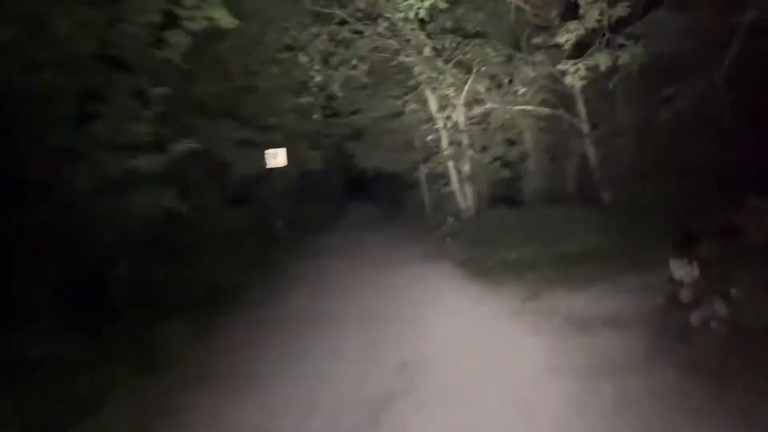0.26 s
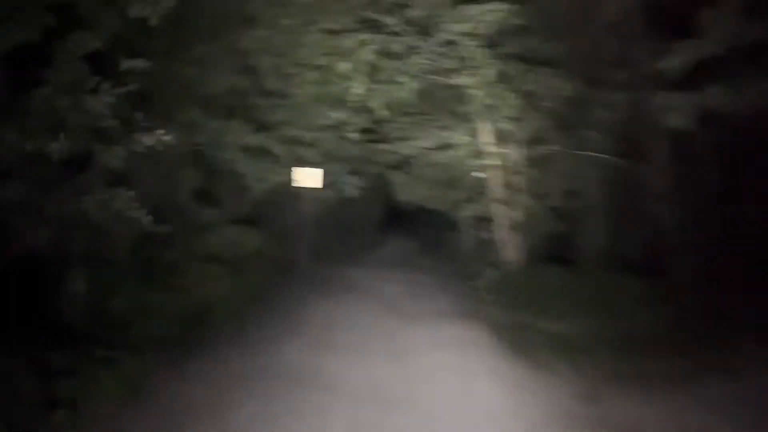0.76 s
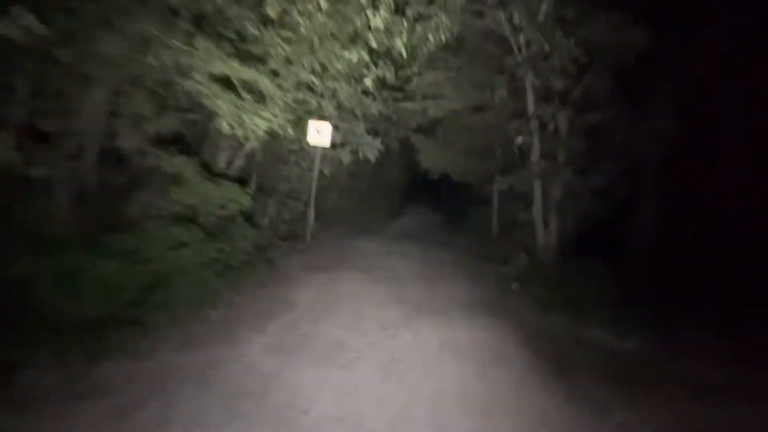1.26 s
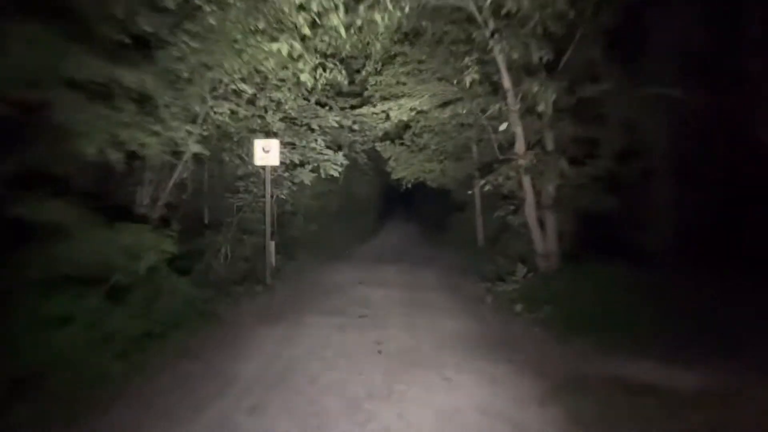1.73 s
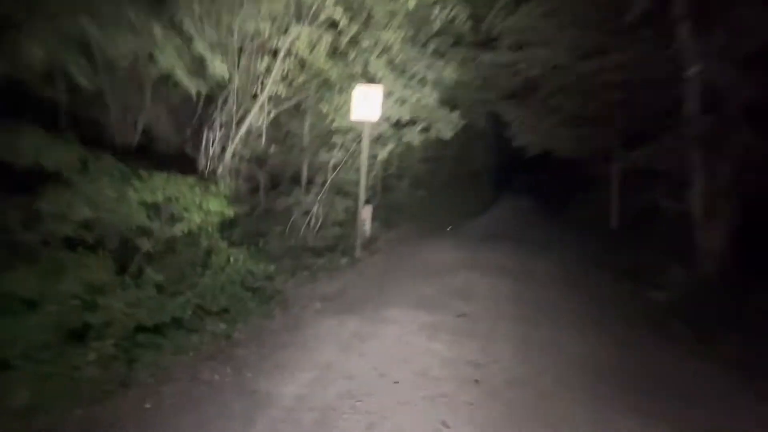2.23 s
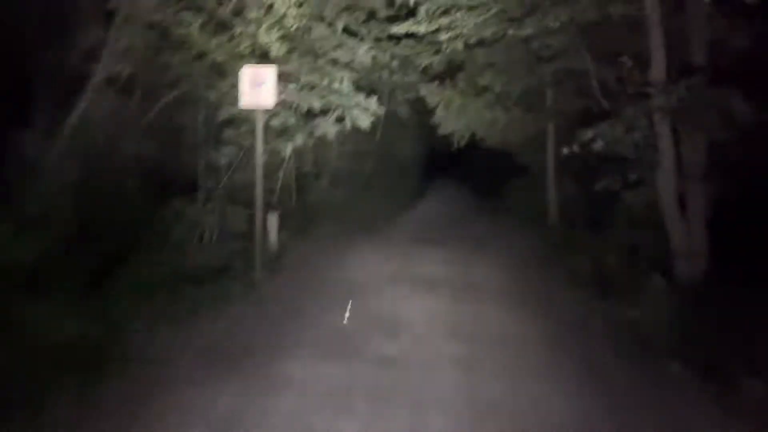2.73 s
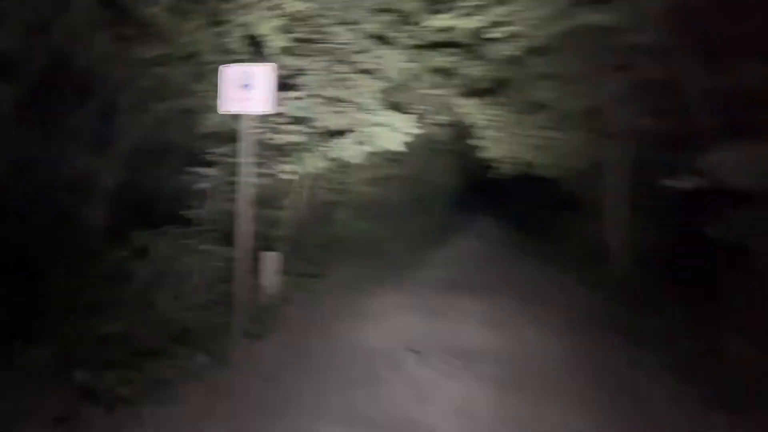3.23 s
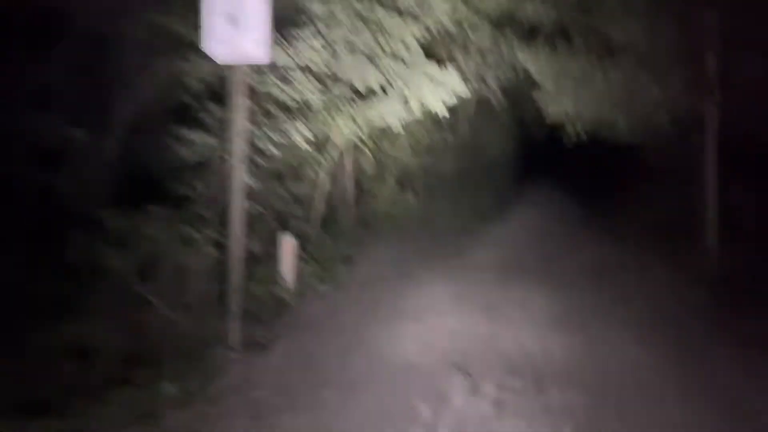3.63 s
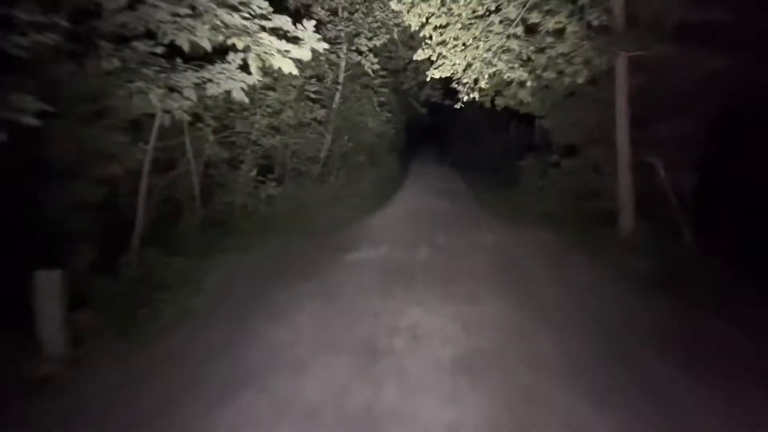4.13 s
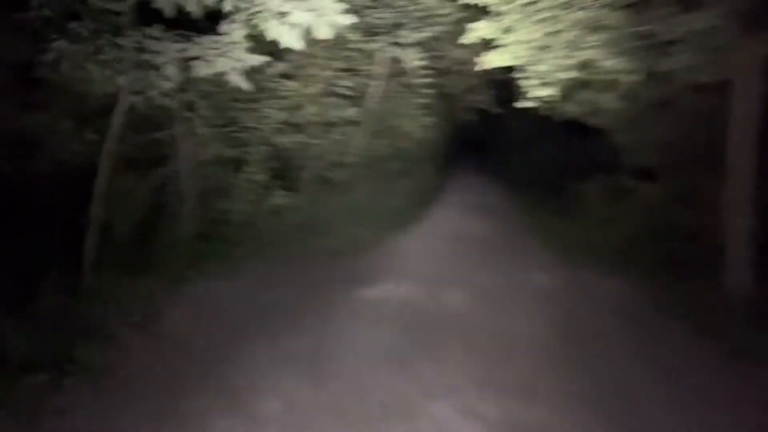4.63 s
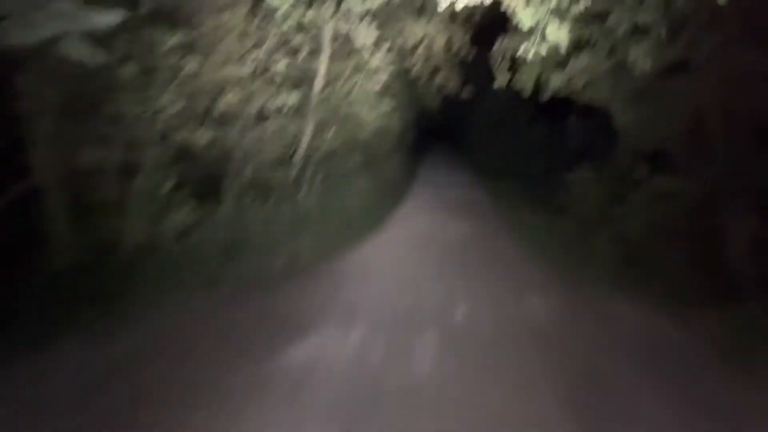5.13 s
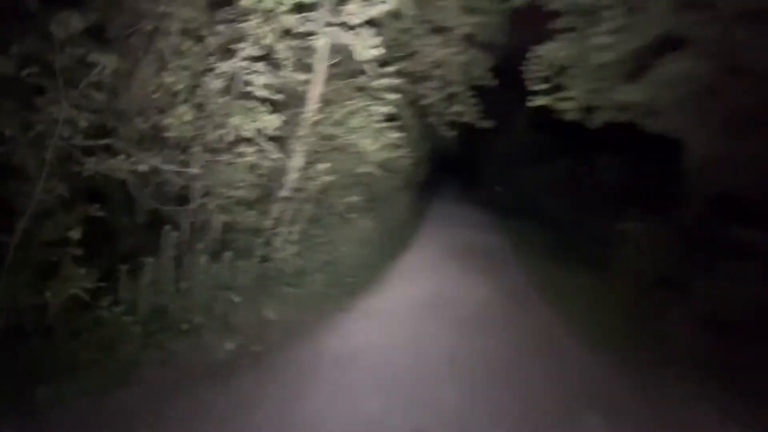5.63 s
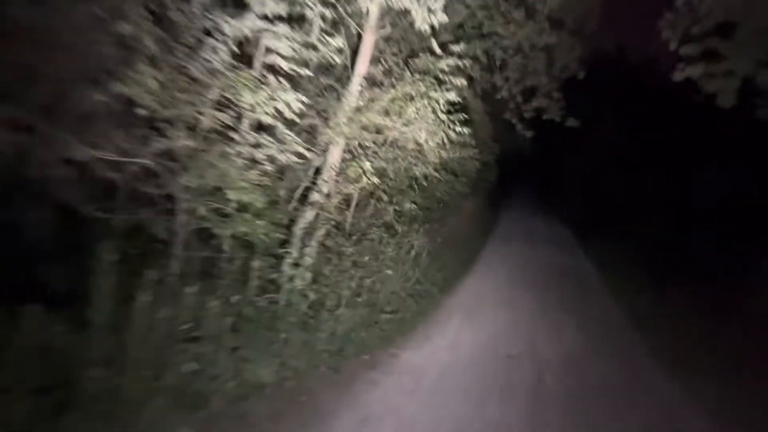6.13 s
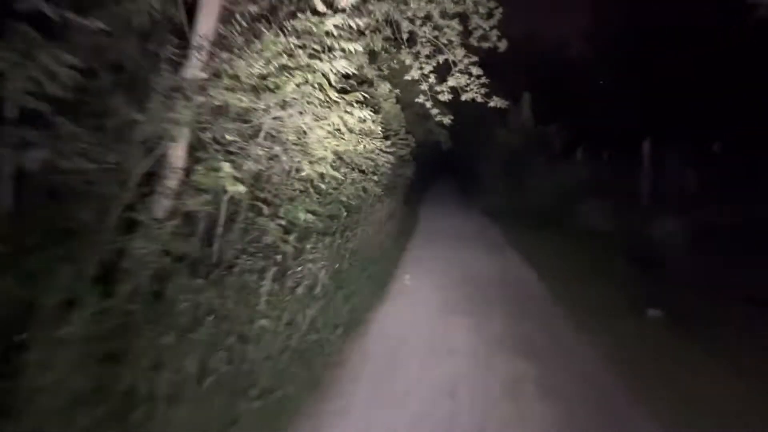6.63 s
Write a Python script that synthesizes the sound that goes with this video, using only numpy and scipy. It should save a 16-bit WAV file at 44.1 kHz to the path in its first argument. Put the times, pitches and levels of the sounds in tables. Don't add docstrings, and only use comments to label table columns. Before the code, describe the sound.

A person hurries along a gravel path outdoors, carrying a small stereo microphone well above the feet. From 0 to 0.7 s, stones grind and tick in a steady gritty crunch, over low rumble and rubbing cloth and soles. From 0.8 to 2.2 s it thins to softer grinding with separate sharp snaps; a low bump comes near 2.26 s. Around 2.5-2.9 s the crunch is densest and brightest, many stones cracking together, followed by a fine gritty scuff near 3.1 s. After a brief dip, another crunch arrives at 3.45 s with a short, hard low thump at 3.49 s and a softer one at 3.6 s, rumble swelling until 3.9 s. It eases from 4 to 5 s, a small bump at 4.5 s, crunches again near 5.4 s, drops around 5.75 s, then gathers light clicks and dull knocks around 6-6.3 s, thinning and fading quickly at 6.8 s.

```python
import sys
import numpy as np
from scipy import signal
from scipy.fft import rfft, irfft, next_fast_len
from scipy.io import wavfile

SR = 44100
rng = np.random.default_rng(int(sys.argv[2]) if len(sys.argv) > 2 else 0)


def digitize_waveform(pressure):
    field = np.atleast_2d(pressure).T
    bounded = np.clip(field, -1, 1)
    quanta = np.round(bounded * 32767).astype(np.int16)
    wavfile.write(sys.argv[1], SR, quanta)


def invert_db(level):
    return 10 ** (np.asarray(level, dtype=float) / 20)


N = 302967
HZ = np.fft.rfftfreq(2 * next_fast_len(N // 2 + 1), 1 / SR)
SIZE = 2 * (len(HZ) - 1)

RANGE_EDGES = [500, 1700, 3000, 4500, 7500, 10800, 17000]


def stones():
    # [f/Hz, level/dB per Hz]
    sum_spectrum = [(290, -20.5), (500, 3.5), (700, 0), (1280, 4.5), (1690, -1.5), (2130, -1.5),
                    (3540, -7.5), (4530, -6.5), (5240, -12), (8210, -20.5), (9630, -17.5), (11600, -20),
                    (14200, -21), (16000, -45)]
    # [f/Hz, level/dB per Hz]
    difference_spectrum = [(290, -13), (500, 6), (708, -1.5), (1530, 3.5), (1790, -10.5), (2650, -10.5),
                           (5160, -15.5), (6510, -16.5), (7100, -15.5), (8580, -11.5), (10100, -17),
                           (12000, -46), (13300, -20), (16000, -22.5)]
    # [f/Hz, width/Hz, level/dB]
    resonances = [(1310, 110, 5.), (2190, 300, 3.), (5230, 260, 5.), (6420, 260, 8.), (9670, 320, 3.),
                  (11300, 260, 4.)]
    # [f/Hz, width/Hz, level/dB]
    notch = (8305, 1120, -8)
    # [f/Hz, angle/rad]
    phase_turn = [(500, 0), (1100, 4), (1460, 4.5), (1810, 4.5), (3300, 1.5), (5000, 1.4), (6800, -2.5),
                  (8100, 1.5), (8500, 1.5), (11500, 1.6), (12200, -1.6)]
    # [f/Hz, share/1]
    common_share = [(500, 0.95), (1200, 1), (2000, 0.18), (5000, 0.18), (9000, 0.12)]

    housing_db = sum(resonance(*row) for row in resonances)
    both = causal(read(sum_spectrum, HZ) + housing_db + resonance(*notch))
    apart = invert_db(read(difference_spectrum, HZ) + 0.5 + 0.067 * housing_db)
    apart = apart * np.exp(1j * (np.angle(both) + read(phase_turn, HZ)))
    ranges = [band(lo, hi) for lo, hi in zip(RANGE_EDGES, RANGE_EDGES[1:])]
    heard = [np.sqrt(np.mean(abs(both * r) ** 2)) for r in ranges]

    def hissed(drive, noise):
        return sum(rfft(d * noise, SIZE) * r / h for d, r, h in zip(drive, ranges, heard))

    cracks, rings = snaps()
    grind = grinding()
    noises = rng.standard_normal((3, N))
    near = hissed(grind, noises[0])
    other = hissed(np.hypot(grind, 0.45 * cracks), noises[1])
    rings = rfft(rings, SIZE) * band(700, 7500) / abs(both).clip(1e-3)
    snap = hissed(cracks, noises[2]) + rings
    same = np.clip(read(common_share, HZ), 0, 1)
    side = same * near + np.sqrt(1 - same ** 2) * other + 0.7 * snap
    return irfft([(near + snap) * both, side * apart], SIZE)[:, :N]


def snaps(t60=0.0056, colour_db=3.5, crumble_db=-17, ring_s=0.016, pop_s=0.00017,
          scatter_s=0.00016, sink_s=0.0003, reach_octaves=0.15):
    # [t/s, level/dB, pitch f/Hz, low part/dB, bright
    # part/dB]
    snapping_stones = [(0.0654, -38, 6700, -22, -14), (0.0941, -42, 6240, -26, -13.5),
                       (0.1247, -40, 6660, -24.0, -10), (0.1347, -49, 6400, -1, -8), (0.161, -37.5, 4200, -15, -3),
                       (0.1759, -45, 4160.0, 3, 2), (0.1823, -36, 2600, 4.5, -11.5), (0.1868, -36.5, 6500, 3, -13.5),
                       (0.1904, -49, 1910, 4, -22), (0.2409, -42.5, 6600, -24.0, -7),
                       (0.2499, -42.5, 1590, -19.5, -5), (0.2839, -41, 3750.0, -22, -29.5),
                       (0.3517, -42, 5000, -24.0, -5), (0.3734, -39, 2280, -3, -8), (0.4332, -38, 2110.0, -24.0, -7),
                       (0.4909, -34, 5100, -23.5, -6), (0.5404, -38, 3710, -25.5, -32.0),
                       (0.5473, -33.5, 2400, -19.5, -10), (0.5558, -28, 5150, -13, -8.5),
                       (0.5626, -34, 1590, -1, -14.5), (0.6067, -35, 5100, -24.0, -14.5),
                       (0.6166, -42, 2280, 1, -12), (0.6308, -41.5, 2310, -24.0, -6),
                       (0.7372, -41, 2350.0, -22, -19), (0.7469, -37.5, 4880, -17.0, -25.5),
                       (0.8277, -35.5, 1870, -23, -34), (1.038, -41, 3710, -20, -21), (1.134, -39, 1500, 0, -27),
                       (1.1826, -43, 5140, -19, -8.5), (1.2078, -38, 3740, -5, -23.5),
                       (1.2494, -45, 4110.0, -22, -15.5), (1.3152, -36.5, 5100, -22, -2.5),
                       (1.4393, -28.5, 2290, -17, -46), (1.4646, -31, 3830, -10, -33.5),
                       (1.474, -41, 3500, -15, -30), (1.4857, -35, 2920, -15.5, -24), (1.6821, -29, 3080, -26, -43),
                       (1.9049, -36, 3790, -22, -40),
                       (1.9093, -39.5, 3700, -24.5, -35), (1.963, -39, 3800, -24.0, -17.5),
             (1.9923, -41.5, 3970, -3, -15.5), (2.034, -34, 2230, -11, -35),
             (2.0398, -30.5, 3000, -13.5, -25), (2.179, -42.5, 4410.0, -31, -21),
             (2.2508, -34, 4900, -6.5, -9), (2.343, -36, 2000.0, -24, -23.5),
             (2.41, -30, 1590, -20.5, -31.5), (2.4896, -38.5, 5170, -8.5, -8),
             (2.5089, -31.5, 3580, 3, -23), (2.5244, -34, 5320.0, 1, -11), (2.5316, -44, 2800, -10.0, 4),
             (2.564, -32, 5190.0, -14, -8.5), (2.569, -39.5, 1956, 1, -10), (2.596, -32.5, 5370, 0, -13),
             (2.6108, -47.5, 4650.0, -24.0, 9), (2.6323, -24.5, 5210, -1, -7), (2.6522, -39, 3670, 13, -9),
             (2.6706, -32, 2240, 3, -18), (2.6767, -25, 5200, -14, -3.5), (2.704, -35.5, 2350.0, 0, -12.0),
             (2.724, -29.5, 2070.0, -4, -5), (2.73, -49, 1610.0, 3.0, -7), (2.7606, -37, 2260.0, -0.5, -21),
             (2.7696, -40, 2020.0, -4, -7), (2.778, -30, 1940, 3, -8), (2.8105, -28.5, 5230, -16.5, -20),
             (2.8235, -30, 2140, -19.5, -34), (2.8348, -23.5, 5210, -4, -8), (2.8409, -21.5, 5140, -14, -6),
             (2.854, -32.5, 5050, -6, -18), (2.859, -32, 1980.0, -1.0, -32.0), (2.888, -40, 6600, -8.5, -3),
             (2.8916, -38.5, 4640, 4, -2), (2.93, -53, 2780.0, -12, 12), (2.954, -37.5, 2450.0, 1, -22),
                       (2.966, -43, 2730.0, -5.0, -11.5), (3.001, -39.5, 5050, -24.0, -15.5),
                 (3.0651, -31.5, 2060, 3.5, -15), (3.1027, -36.5, 2260, 1, -6),
                 (3.117, -34, 2430, 4, -10.5), (3.1572, -39, 4960, 6, -10), (3.1787, -27, 2040, 1, -3),
                 (3.1849, -27, 5200, -1, -8), (3.19, -32, 2520, 8, -18), (3.197, -39, 4770, -7, -6),
                 (3.212, -34, 4720, 4, -11), (3.2381, -36, 6660, 2, -5), (3.3667, -34.5, 2530, -3, -6.5),
                 (3.3893, -46, 5240, -22, -3), (3.4049, -40.5, 4850, -24.0, -4.5),
                 (3.4283, -34, 2380, 1, -7), (3.434, -40, 2130.0, 1, -9), (3.451, -33.5, 5150, 9, -15),
                 (3.4559, -31, 2320, 2, -6), (3.463, -43.5, 3980, 1, 2.0), (3.484, -31.5, 5200, 4, -7),
                 (3.518, -39, 5350, -24.0, -3), (3.641, -38.5, 1610.0, 16, -14),
                 (3.669, -30.5, 3970, 7, -16), (3.6776, -47.5, 1740.0, -12.0, -2),
                 (3.686, -49, 4160.0, -17.0, 3), (3.6979, -40.5, 4940, -0.5, -2),
                 (3.777, -43, 2650.0, -15.0, 0.5), (3.7965, -45.5, 6500, 1.5, 0),
                 (3.805, -41, 1870.0, 4, -9), (3.842, -48, 4460.0, -9.0, 1), (3.868, -44, 6400, -11.5, 4),
                 (3.8888, -37.5, 4480.0, -1, -10),
                       (3.907, -43, 2860, 2.5, -10), (3.925, -44, 4050.0, -24.0, -6), (4.056, -40, 4270, -5, -19),
             (4.099, -44.5, 2390.0, 2, -6.5), (4.1213, -30, 3040, 1, -24.5), (4.2308, -32, 2020, -7, -32.0),
             (4.244, -34, 5110, -20, -8), (4.2647, -39.5, 5000, -11, -6.5), (4.2714, -40.5, 2370.0, 7, -9),
             (4.2934, -41, 5060, -8, -6), (4.3199, -31.5, 2170, -11, -35),
             (4.3874, -31.5, 3920.0, -17, -38), (4.408, -37, 3980.0, -9, -25),
             (4.4673, -39.5, 4360, -14, -12.5), (4.4993, -45, 3980.0, -34, -9.5),
             (4.5792, -39.5, 3200, -22, -23), (4.5877, -41.5, 5000, -30, -16), (4.8153, -44, 2350, 3, -4),
             (4.825, -45, 6500, 5, -2.5), (4.85, -52, 5080.0, -7.5, 10), (4.8654, -56, 1620, 10, 8.0),
             (4.888, -43.5, 6480, -24.0, -2), (4.9106, -37.5, 5100, 0, -5.5),
             (4.9761, -40.5, 4650, -24, -16), (4.982, -47, 2350.0, -24.0, -25.0),
             (5.0351, -40, 4400, -5, -17), (5.0491, -34.5, 2240, 1, -11.5), (5.2954, -51, 5120, 1, 4),
             (5.3475, -40, 3750.0, -18, -30.0), (5.3623, -34.5, 2620, -10, -20),
             (5.4, -41, 2390.0, -10.0, -4), (5.4153, -40, 2970, -13.0, -22), (5.453, -39, 4780.0, -1, -34),
             (5.4918, -38.5, 5130, 7, -26), (5.5483, -40.5, 1590, -4, -21), (5.6489, -45.5, 3990, -13, -14),
                       (5.6983, -44, 6600, -6, -21), (5.7714, -49, 2370.0, -28.5, -13),
            (5.7985, -43.5, 2340, -25, -18), (5.879, -42, 2230, -6, -6), (5.8906, -44.5, 6540, -19.5, -9),
            (5.9047, -55, 2020.0, -24.0, 11.5), (6.007, -41, 1980.0, 3, -16), (6.0199, -39, 1700, -11, -14),
            (6.029, -38, 1960.0, -6.5, -18), (6.0423, -39.5, 2770, 6, -18), (6.0858, -43, 4570.0, -28, -15),
            (6.115, -45.5, 6540, -24.0, 1), (6.141, -40, 2150, -24, 0), (6.16, -38.5, 2040, -24.0, -3),
            (6.1944, -43, 5000, -6, -3), (6.2152, -27.5, 5220, 1, -7.5), (6.2215, -41, 2000, -7, -10),
            (6.2364, -41.5, 2080, -10, -6.5), (6.2488, -35, 2150.0, -18, -23), (6.2516, -45, 5000, -15, -1),
            (6.274, -32, 2310, -10, -7), (6.2806, -37, 1710, 1, -10.0), (6.2859, -41, 2120, -22, -18),
            (6.295, -41.0, 1790.0, -8, -10), (6.336, -40, 2353, 5.5, 3), (6.3138, -39.5, 2090, -15, -14),
            (6.397, -36.5, 3060.0, -1, -32.0), (6.404, -41.5, 4930, 2, -2.5), (6.413, -38, 4600, -28, -19),
            (6.523, -50.5, 5000, -8, 3.5), (6.5415, -36, 2330, 1, -10), (6.55, -44.5, 1970, 0, -2),
            (6.6083, -40, 2130.0, 3, -7), (6.616, -42.5, 6300, 3, -6), (6.6902, -49, 6540, -30, 1),
            (6.708, -41.5, 1610.0, 13, -13), (6.715, -41, 4900, 4, -2), (6.7296, -41, 2310, -4, -10)]
    events = snapping_stones + loose_chips()

    out = np.zeros((len(RANGE_EDGES) - 1, N + 1200))
    rings = np.zeros(N + 1200)
    chance = rng.standard_normal((len(events), len(out) + 1))
    t = np.arange(-400, 800) / SR
    late = np.maximum(t, 0)
    give_s = 0.0006
    strain = np.clip(1 + t / give_s, 0, 1) ** 2
    crack = strain * invert_db(-60 * late / t60)
    crack = crack + invert_db(crumble_db) * np.exp(-((t - 0.0012) / 0.0055) ** 2)
    pop = np.exp(-(t / pop_s) ** 2)
    middles_hz = np.sqrt(np.multiply(RANGE_EDGES[1:4], RANGE_EDGES[2:5]))
    sink = sink_s * np.log2(5000 / np.array(RANGE_EDGES[1:]))
    for (s, db, hz, low_db, bright_db), (*own, turn) in zip(events, chance):
        dull = np.clip((-11.5 - bright_db) / 17.0, 0.04, .9)
        near = 0.7 + np.exp(-(np.log2(middles_hz / hz) / reach_octaves) ** 2)
        middle_db = 10 * np.log10(near / near.sum() * (1 - dull)) + 0.033
        shares_db = np.array([low_db + 0.16, *middle_db, bright_db + 2.0, bright_db - 4.5])
        shares_db[0] = min(shares_db[0], 0)
        at = max(round(s * SR) - 410, 0)
        lags = np.rint(SR * (scatter_s * np.array(own[::-1]) + sink)).astype(int)[:, None]
        gain = invert_db(db - 2.5 + shares_db + colour_db * np.array(own))[:, None]
        out[:, at:at + 1200] += crack[(np.arange(1200) - lags).clip(0, 1199)] * gain
        ring = strain * invert_db(db + 3.5 - 60 * late / (ring_s * np.sqrt(hz / 5000)))
        ring = ring * np.sin(2 * np.pi * (hz * t + turn))
        burst = invert_db(db + 6.0) * pop * np.sin(2 * np.pi * (np.sqrt(hz * 3300) * t + turn))
        rings[at:at + 1200] += np.sqrt(1 - dull) * ring + np.sqrt(dull) * burst
    return out[:, :N], rings[:N]


def loose_chips(count=1000, over_db=-7.5, spread_db=1.7):
    when, size, pitch, low, bright = rng.random((count, 5)).T
    crowd = np.cumsum(invert_db(along(1)))
    when = np.interp(when, crowd / crowd[-1], np.arange(N) / N)
    at = (when * N).astype(int)
    weight = along(1)[at]
    db = weight + 0.26 * (weight - weight.mean()) + over_db - spread_db * np.log(size + 0.017)
    top_db = np.minimum(1.24 * (fizz()[at] - weight + 3.7) - 14 * bright, -3)
    return list(zip(when * N / SR, db, 1500 * 4.5 ** pitch, -4.5 - 14 * low, top_db))


def grinding(per_s=150, spread_db=5.0, t60=0.0061, grit=0.216, clump_db=1.5, drift_db=1.6):
    shape = (len(RANGE_EDGES) - 1, N)
    size = invert_db(spread_db * np.minimum(rng.exponential(1, shape), 4))
    size = size * (rng.random(shape) < per_s / SR)
    size = size + .5 * np.roll(size, 1, axis=0) + .5 * np.roll(size, -1, axis=0)
    slips = signal.lfilter([1], [1, -invert_db(-60 / (t60 * SR))], size)
    drift = np.array([flutter(4.5) for _ in range(4)] + [.5 * flutter(6.0)] * 2)
    clumps_db = clump_db * flutter(21) + drift_db * drift
    drive = evened((np.sqrt(1 - grit) + np.sqrt(grit) * evened(slips)) * invert_db(clumps_db))
    tilt_db = [-6.0, -13.5, -10.5, -16.0]
    weight, fine = along(1), fizz()
    bed = weight - 0.3 * (weight - weight.mean())
    return drive * invert_db([bed + db for db in tilt_db] + [fine, fine - .8])


def fizz(rest_db=-70.5, follows=0.25):
    # [t/s, level/dB, half length/s]
    scuffs = [(0.2, -66, 0.06), (0.45, -64.5, 0.11), (1.19, -69, 0.12), (2.7, -64.5, 0.11),
              (2.9, -64, 0.05), (3.09, -60, 0.094), (3.53, -60, 0.09), (4.28, -64.5, 0.16),
              (4.85, -61.5, 0.022), (5.4, -66, 0.1), (5.9, -65, 0.023), (6.07, -65.5, 0.087)]
    weight = along(1)
    return humps(scuffs, rest_db + follows * (weight - np.mean(weight)))


def shuffle():
    # [f/Hz, level/dB per Hz]
    wash = [(88, -8), (150, -5), (215, 1), (286, -1), (317, 1), (545, -2.5), (900, -13), (1170, -18.5),
            (1980, -120)]
    # [f/Hz, level/dB]
    wash_side = [(90, -23), (160, -25), (270, -5.5), (450, 1.5), (800, -4.5)]
    a, b = rng.standard_normal((2, N)) * invert_db(2.25 * flutter(45))
    mid = shaped(a, invert_db(read(wash, HZ)))
    wide = invert_db(read(wash, HZ) + read(wash_side, HZ))
    side = shaped(0.64 * b, wide)
    side = side + shaped(0.31 * a, wide * np.exp(-2.1j))
    return np.array([mid, side]) / np.std(mid) * invert_db(along(2))


def shaking():
    # [f/Hz, level/dB per Hz]
    rumble_spectrum = [(15, -71), (34, -10.5), (65, -0.5), (118, -6.5), (167, -12.5), (220, -14),
                       (290, -26), (480, -120)]
    # [t/s, level/dB, half length/s]
    lurches = [(0.04, -45.5, 0.12), (0.32, -47, 0.039), (0.72, -54, 0.096), (2.27, -40, 0.018),
               (2.52, -54, 0.26), (2.95, -57, 0.24), (3.22, -48, 0.078), (3.52, -45, 0.12),
               (3.72, -39, 0.1), (3.85, -39.5, 0.054), (4.48, -49.5, 0.067), (4.81, -48, 0.062)]
    # [t/s, peak level/dB, f/Hz, t60/s]
    bumps = [(0.169, -33, 323, 0.31), (0.739, -29, 53.8, 0.081), (2.259, -23.5, 72.4, 0.099),
             (0.53, -35, 252, 0.2), (2.565, -32, 273, 0.12), (2.848, -30.5, 207, 0.2),
             (3.451, -26.5, 213, 0.097), (3.487, -10.5, 207, 0.022), (3.605, -18, 214, 0.047),
             (4.501, -29, 138, 0.06), (6.02, -34, 730, 0.059), (6.025, -36, 846, 0.095),
             (6.015, -33, 524, 0.13), (6.04, -30, 550, 0.094), (6.18, -41, 320, 0.49),
             (6.226, -35.5, 322, 0.22), (1.747, -35.5, 80, 0.084), (1.901, -34, 74, 0.24),
             (2.839, -29, 133, 0.1), (2.93, -35, 530, 0.17), (5.67, -34.5, 65, 0.11),
             (6.255, -34, 196, 0.095), (6.61, -34, 70, 0.12), (6.27, -35, 316, 0.091)]
    rumble = shaped(rng.standard_normal(N) * invert_db(2.4 * flutter(26)), invert_db(read(rumble_spectrum, HZ)))
    out = evened(rumble) * invert_db(humps(lurches, -55))
    t = np.arange(8000) / SR
    for s, db, hz, t60 in bumps:
        part = out[round(s * SR):][:8000]
        knock = invert_db(db - 4.0 - 60 * t / t60) * np.minimum(t / 0.0085, 1) * np.sin(2 * np.pi * hz * t)
        part += knock[:len(part)]
    return out


def shaded(x):
    # [f/Hz, width/Hz, level/dB, t/s, half length/s]
    shadows = [
        (671, 143, -8.5, 2.33, 0.5),
        (643, 130, -5.5, 3.23, 0.54),
        (911, 180, 4.5, 3.32, 0.65),
    ]
    hz, t, z = signal.stft(x, SR, nperseg=1024)
    db = sum(d * np.exp(-((hz[:, None] - f) / w) ** 2 - ((t - s) / half) ** 2)
             for f, w, d, s, half in shadows)
    return signal.istft(z * invert_db(db), SR, nperseg=1024)[1][:N]


def along(column):
    # [t/s, weight grinding the small stones level/dB, swing of soles and cloth level/dB]
    tread = [(0.0, -47, -48.5), (0.2, -45, -48.5), (0.5, -44, -47), (0.72, -47, -50), (1.2, -51, -52.5),
             (2.3, -47, -49), (2.55, -42.5, -44), (2.72, -43, -44), (3.1, -43.5, -48), (3.33, -49.5, -50.5),
             (3.479, -42.5, -47), (3.8, -44, -46.5), (4.04, -49.5, -50.5), (4.72, -52, -51),
             (5.4, -46.5, -48.5), (5.76, -55.5, -52.5), (6.06, -47.5, -50), (6.87, -52.5, -49)]
    rows = np.array(tread)
    return np.interp(np.arange(N) / SR, rows[:, 0], rows[:, column])


def humps(rows, rest_db):
    t = np.arange(0, N + 64, 64) / SR
    power = invert_db(2 * np.interp(t, np.arange(N) / SR, rest_db * np.ones(N)))
    power = power + sum(invert_db(2 * db) * np.exp(-((t - s) / half) ** 2) for s, db, half in rows)
    return np.interp(np.arange(N) / SR, t, 10 * np.log10(power))


def flutter(hz):
    return evened(shaped(rng.standard_normal(N), 1 / (1 + (HZ / hz) ** 2)))


def evened(x):
    return x / np.sqrt(np.mean(x ** 2) + 1e-20)


def read(points, hz):
    f, value = np.transpose(points)
    return np.interp(np.log(hz + 1), np.log(f + 1), value)


def resonance(hz, width_hz, db):
    return db / (1 + (2 * (HZ - hz) / width_hz) ** 2)


def shaped(x, gain):
    return irfft(rfft(x, SIZE) * gain, SIZE)[:N]


def causal(db):
    log_gain = np.log(invert_db(np.maximum(db, -100)))
    circle = np.concatenate([log_gain, log_gain[-2:0:-1]])
    return np.exp(np.conj(signal.hilbert(circle))[:len(db)])


def band(lo_hz, hi_hz):
    return 1 / np.sqrt((1 + (lo_hz / (HZ + 1)) ** 8) * (1 + (HZ / hi_hz) ** 8))


def scene():
    mid, side = np.array(stones()) + shuffle()
    mid = shaded(mid) + shaking()
    fade = invert_db(-7. * np.clip((np.arange(N) / SR - 6.78) / 0.065, 0, 1))
    return np.array([mid + side, mid - side]) * fade


def low_pass(x):
    return signal.sosfilt(signal.butter(12, 16480, fs=SR, output="sos"), x)


def record(dry):
    return low_pass(dry)


dry = scene()
out = record(dry)
digitize_waveform(out)
```